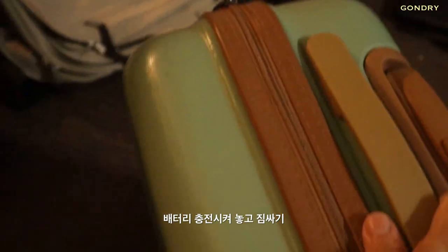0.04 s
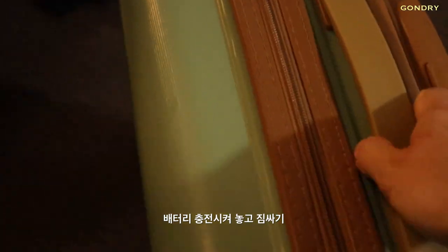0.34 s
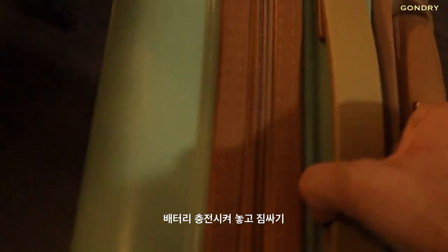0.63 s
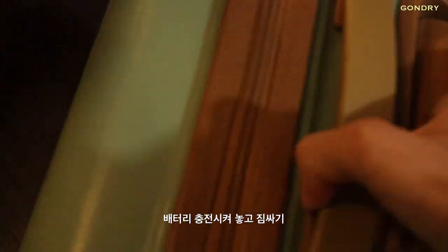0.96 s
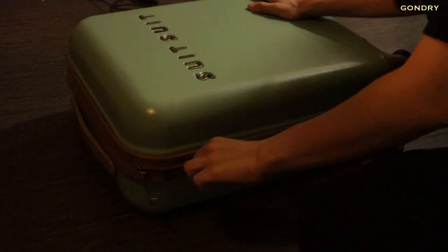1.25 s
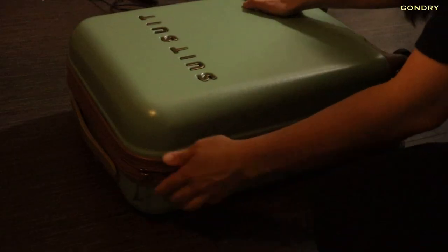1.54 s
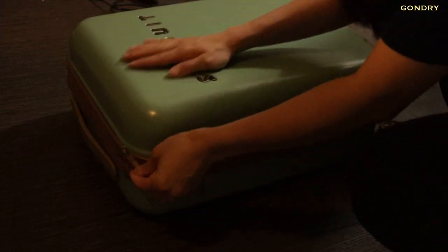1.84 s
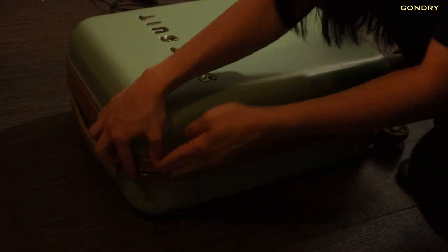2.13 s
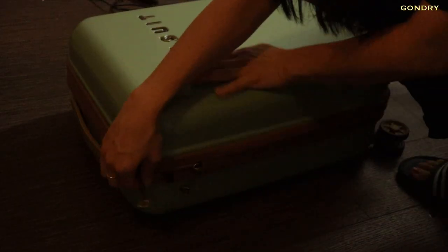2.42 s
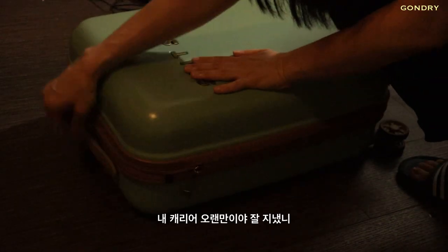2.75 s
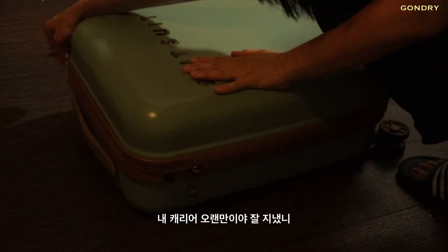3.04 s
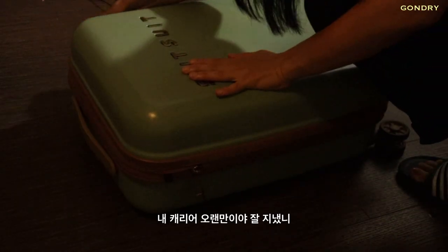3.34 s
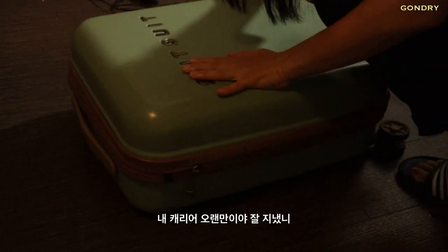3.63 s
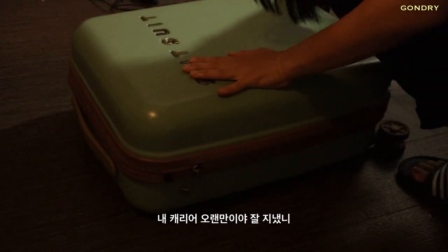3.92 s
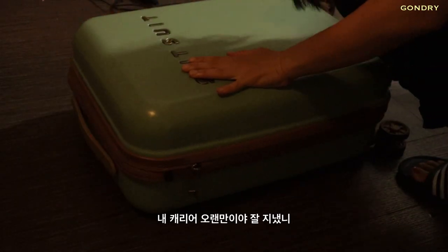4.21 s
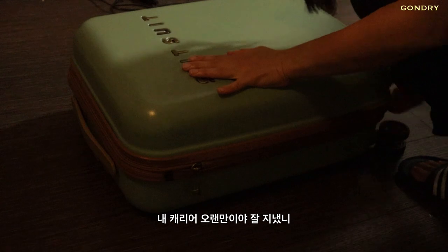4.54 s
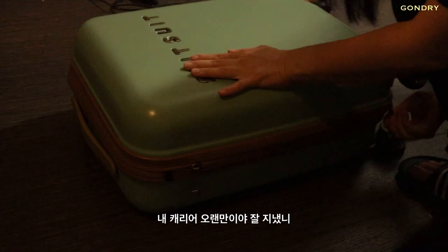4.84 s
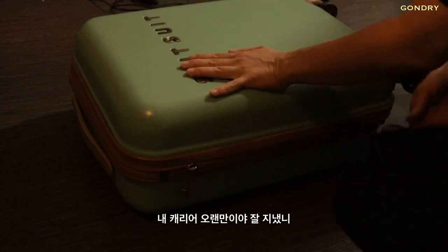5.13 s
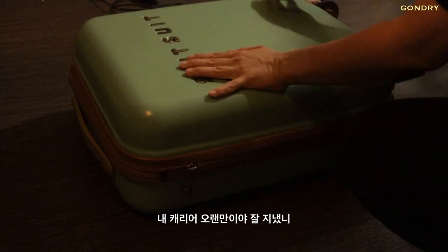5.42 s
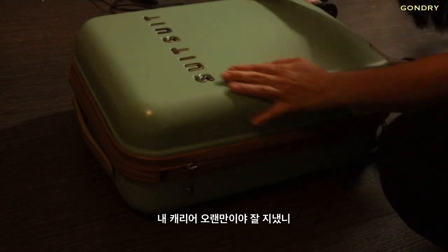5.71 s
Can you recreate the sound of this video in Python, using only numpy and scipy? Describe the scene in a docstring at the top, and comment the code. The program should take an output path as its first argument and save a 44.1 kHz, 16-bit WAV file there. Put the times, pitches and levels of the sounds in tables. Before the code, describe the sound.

Hands rub a hard-shell suitcase, metal pull tabs click and snap, and the zipper rasps open in four strokes in a small room.

```python
"""A zipper runs round a hard-shell suitcase in four strokes, on the floor of a small room. Each tooth ticks as
it parts; the ticks blur into a buzz that rises with speed, and the shell hums along. Metal pull tabs click and
jingle, mostly before it but also during and after, and one snaps out of its lock. Palms rub over the plastic
and the hollow case gives soft knocks, over still air and a deep drone."""
import sys
import numpy as np
from scipy import signal
from scipy.fft import rfft, irfft
from scipy.io import wavfile
from scipy.ndimage import uniform_filter1d

SR = 44100
rng = np.random.default_rng(int(sys.argv[2]) if len(sys.argv) > 2 else 0)


def generate_wav(signal):
    """Clip the signal to [-1, 1] and save it as 16-bit WAV at the path in sys.argv[1]."""
    frames = np.transpose(np.atleast_2d(signal))
    scaled = np.clip(frames, -1, 1) * 32767
    pcm = np.round(scaled).astype(np.int16)
    wavfile.write(sys.argv[1], SR, pcm)


N = 254456
TIME, FREQS_HZ = np.arange(N) / SR, np.fft.rfftfreq(N, 1 / SR)


def amp(db):
    """Turns decibels into a gain."""
    return 10 ** (np.asarray(db) / 20)


def unit(x):
    """Scales a signal to an average strength (rms) of 1."""
    return x / np.sqrt(np.mean(x ** 2) + 1e-20)


def read(points, hz):
    """Looks up a curve at any pitch, blending between its points."""
    point_hz, value = np.transpose(points)
    return np.interp(np.log(hz + 1), np.log(point_hz + 1), value)


def colour(x, points):
    """Makes some pitches louder and others softer, following a curve."""
    return irfft(rfft(x) * amp(read(points, np.fft.rfftfreq(x.shape[-1], 1 / SR))), x.shape[-1])


def below(x, edge):
    """Near 1 under the edge, falling smoothly to 0 above it."""
    return 1 / (1 + (x / edge) ** 4)


def bump(hz, centre_hz, octaves):
    """A bell-shaped hill around one pitch."""
    return np.exp(-(np.log2((hz + 1) / centre_hz) / octaves) ** 2)


def wander(hz):
    """A random wobble, mostly slower than hz."""
    return unit(irfft(rfft(rng.standard_normal(N)) * below(FREQS_HZ, hz), N))


def gate(start_s, end_s):
    """1 between two times and 0 outside, with soft edges."""
    return uniform_filter1d(1.0 * (TIME >= start_s) * (TIME <= end_s), size=300)


def swell(*times_s):
    """One push of a hand: rises from the earliest time, peaks at the middle one, ends at the latest."""
    push = np.interp(TIME, np.sort(times_s), [0, 1, 0])
    return uniform_filter1d(np.sin(np.pi / 2 * push) ** 1.47, size=900)


def add(mix, start_s, sound):
    """Drops a sound into the mix."""
    part = mix[..., round(start_s * SR):][..., :sound.shape[-1]]
    part += sound[..., :part.shape[-1]]


def spread(pair, width):
    """Makes left and right from two noises: alike in the bass, different in the treble."""
    side = colour(pair[1], width)
    return np.array([pair[0] + side, pair[0] - side])


# How long the room echoes (a fade is a drop of 60 dB): pitch_hz, fade_s
ROOM_FADE = [(120, 0.23), (500, 0.34), (2500, 0.29), (6000, 0.33), (13000, 0.18)]
# How much the echo differs between left and right: pitch_hz, side_db
ECHO_WIDTH = [(60, -36), (250, -19), (700, -16), (1400, -21), (2400, -14), (4000, -2.5), (7000, 3),
              (12000, 3)]

def room(x, early_db, tail_db, early_s=0.017):
    """The direct sound, quick echoes off floor and case, then the fading tail of the room."""
    size = SR // 2
    t = np.arange(size) / SR
    bounces = rng.standard_normal((2, 2, size)) * (rng.random((2, 2, size)) < 5000 / SR) * (t > .0015)
    hz, age_s, bands = signal.stft(bounces[0], SR, nperseg=256)
    bands = bands * amp(-60 * age_s / read(ROOM_FADE, hz)[:, None])
    tail = signal.istft(bands, SR, nperseg=256)[1][:, :size]
    tail *= 1 - np.exp(-t / 0.0092)
    tail = amp(tail_db) * tail / np.linalg.norm(tail[0])
    early = bounces[1] * np.exp(-t / early_s)
    early = amp(early_db) * early / np.linalg.norm(early[0])
    echo = spread(tail + early, ECHO_WIDTH)
    echo[:, 0] += 1  # the direct sound
    return signal.fftconvolve(x[None], echo, axes=1)


def tone(hz, waver):
    """A pure tone whose pitch wavers."""
    return np.sqrt(2) * np.sin(2 * np.pi * np.cumsum(hz * (1 + waver * wander(13.5))) / SR)


# The tone of still air: pitch_hz, level_db
AIR_COLOUR = [(15, -25), (30, -18), (45, -19), (62, 1.5), (130, 4), (200, 0), (310, -7), (725, -11),
              (2200, -18.5), (4000, -26), (6200, -37.5), (11000, -39), (14000, -52)]
# How much air and rubbing differ between left and right: pitch_hz, side_db
AIR_WIDTH = [(60, -36), (170, -20), (350, -9), (700, -6), (1400, -8), (2800, -8), (6000, 0), (12000, 2)]

def background(air_db=-53.5, drone_db=-63, lift_db=7.7, whine_db=-72.5):
    """Still air, a deep drone that is louder for a moment early on, and a faint whine."""
    air = unit(colour(spread(rng.standard_normal((2, N)), AIR_WIDTH), AIR_COLOUR)) * amp(air_db)
    drone = tone(hz=46.4, waver=0.053) * amp(drone_db + lift_db * gate(0.3, 1.25))
    whine = tone(hz=2364, waver=0.00287) * amp(whine_db)
    return air + drone + whine


# Swells of low rumble: three times for swell() (time_s, time_s, time_s), level_db
RUMBLE_SWELLS = [(0, 0.643, 1.01, -48.5), (1.183, 1.36, 1.35, -47), (1.8, 2.3, 2.33, -52)]
# The tone of the rumble: pitch_hz, level_db
RUMBLE_COLOUR = [(30, -13), (55, -14), (80, -2.5), (120, 3), (240, -3), (330, -7.5), (700, -19),
                 (2000, -82)]

def rumble(gain_db=-3):
    """Swells of low rumble."""
    swells = sum(swell(*times_s) * amp(db + gain_db) for *times_s, db in RUMBLE_SWELLS)
    return unit(colour(rng.standard_normal(N), RUMBLE_COLOUR)) * swells


# Palms sliding on the shell: start_s, peak_s, end_s, rub_db, sheen_db
RUBS = [(0, 0.015, .35, -53.5, -60), (.01, .21, 0.65, -47, -92), (.35, .6, 1.03, -57, -97),
        (1.04, 1.202, 1.29, -69, -66), (1.227, 1.27, 1.33, -54, -87), (1.52, 1.555, 1.66, -52.5, -64),
        (1.645, 1.68, 1.79, -42.5, -59), (1.7, 1.846, 2, -44.5, -54.5), (1.863, 2.163, 2.55, -50, -58),
        (1.958, 1.98, 2.034, -40.5, -65), (5.068, 5.13, 5.47, -55, -76), (5.46, 5.736, 6.1, -51.5, -69)]
# The tone of skin on plastic: pitch_hz, level_db
PALM_COLOUR = [(120, -23), (200, 2), (280, -11.5), (301, -12), (478, -4), (561, -34), (1040, -7),
               (2050, -1), (8070, -14), (11300, -11), (14000, -38)]

def palms(rub_gain_db=-3, sheen_gain_db=-2, grain_db=3, flutter_db=1):
    """Dry skin crosses textured plastic in tiny slips: a soft rub with a thin, high sheen on top."""
    slips = rng.standard_normal((2, N)) * amp(grain_db * wander(2400) + flutter_db * wander(5.5))
    hiss = rfft(colour(spread(slips, AIR_WIDTH), PALM_COLOUR))
    rub = unit(irfft(hiss * below(FREQS_HZ, 7800), N)) * amp(rub_gain_db)
    sheen = unit(irfft(hiss * (1 - below(FREQS_HZ, 10000)) ** 2, N)) * amp(sheen_gain_db)
    return sum(swell(*times_s) * (rub * amp(rub_db) + sheen * amp(sheen_db))
               for *times_s, rub_db, sheen_db in RUBS)


# Soft knocks on the case: start_s, level_db, pitch_factor, fade_factor
KNOCKS = [(0.325, -45, 1.55, 1), (0.692, -36, 0.94, 0.73), (0.82, -46.5, 1.53, .6),
          (0.986, -33.5, 0.99, 0.35), (1.311, -43, 1.2, 1), (1.57, -29.5, 1, 0.93), (1.672, -33, 1.07, 1.4),
          (1.829, -43.5, 0.55, 1.4), (1.862, -39, 0.87, 0.64), (2.188, -34, 0.89, 1.6),
          (2.439, -39, 0.95, 1), (2.482, -37, 0.84, 1), (2.545, -39, 1.17, 1), (2.735, -38, 1.1, 1.3),
          (2.819, -29.5, 1, 1.9), (4.117, -43, 1.05, 1.02), (4.611, -27, 1.04, 1),
          (5.267, -43.5, 1.4, 0.96), (5.56, -37.5, 0.92, 1), (5.651, -32, 0.99, 0.39),
          (5.748, -42, 0.92, 0.87)]
# The notes of the knocked shell: pitch_hz, level_db, fade_s
SHELL_NOTES = [(143.5, 7.5, 0.07), (154.4, 18.5, 0.091), (179.4, 3, 0.13), (260, -10, 0.11),
               (388, -18, 0.045)]

def knocks(gain_db=1):
    """The hollow shell answers a blow with a few short, low notes."""
    t, out = np.arange(SR // 4) / SR, np.zeros((2, N))
    for start_s, db, pitch_factor, fade_factor in KNOCKS:
        thud = 0
        for hz, note_db, fade_s in SHELL_NOTES:
            pitch_hz = hz * pitch_factor * rng.uniform(.96, 1.04)
            thud += amp(note_db - 60 * t / (fade_s * fade_factor)) * np.sin(2 * np.pi * pitch_hz * t)
        soft_start = below(.001, t + 1e-6)
        thud = np.gradient(thud * soft_start)  # a small panel gives off little deep bass
        add(out, start_s, amp(db + gain_db) * room(thud / abs(thud).max(), early_db=-4, tail_db=-10.5))
    return out


# Rings of a pull tab: start_s, level_db, free_s, upper_notes_db, rattle_radians (drift over 1 ms)
JINGLES = [(1.509, -52, .005, -12, .5), (1.655, -47.5, 0.0062, -2, 1.1), (1.674, -41.5, 0.012, 7, .7),
           (1.713, -49, 0.0033, 3, 1.1), (2.19, -29.5, 0.04, -8, .14), (2.347, -46.5, 0.0039, -5, 1.2),
           (2.385, -56.5, .0015, 1, 1.5), (2.436, -57, 0.0027, -3, 1.2), (2.447, -62, .002, 3, 1.4),
           (4.74, -64.5, .004, 2, 1.4), (5.084, -58.5, 0.0041, 8, 1.6), (5.219, -71, .006, 7, 1.3),
           (5.316, -63, .004, 0, 1.6), (5.357, -69, .004, 3, 1.6), (5.409, -69, .015, 12, .7)]
# The notes of a metal tab: pitch_hz, level_db, fade_s
TAB_NOTES = [(9200, -25, 0.077), (10450, 0, 0.19), (10600, -11, .085), (11880, -6, 0.07), (12100, -10, .1),
             (12600, -19, .048)]

def jingles(vary_db=1.5, upper_hz=11500):
    """A struck pull tab rings until fingers grip it; rattling on its loop blurs its pitch."""
    t, out = np.arange(SR // 10) / SR, np.zeros((2, N))
    for start_s, db, free_s, upper_db, rattle in JINGLES:
        ring = 0
        for hz, note_db, fade_s in TAB_NOTES:
            blur = rattle * np.cumsum(rng.standard_normal(len(t))) / np.sqrt(SR / 1000)
            height_db = note_db + upper_db * (hz > upper_hz) + vary_db * rng.standard_normal()
            ring += amp(height_db - 60 * t / fade_s) * np.sin(2 * np.pi * hz * t + blur)
        ring *= below(t, free_s) ** 2  # the fingers close on it
        ring = room(ring / np.linalg.norm(ring), early_db=-11, tail_db=-27, early_s=.008)
        add(out, start_s, amp(db) * np.sqrt(.01 * SR) * ring)
    return out


# Spells of fidgeting: start_s, end_s, ticks_per_s, level_db
FIDGETS = [(0.85, 1.298, 7, -75), (1.748, 2.112, 8, -50), (3.85, 4.2, 6, -57), (5.1, 5.4, 9, -57)]
# What the ticks share: hollow_db, bright_db, spot_hz, skid_s
TICK = (1, -31, 1627, -1)

def fidgets(vary_db=2.5, vary_octaves=0.48):
    """Fingers and tabs tick faintly at random moments; gives extra rows for clicks() to play."""
    hollow_db, bright_db, spot_hz, skid_s = TICK
    rows = []
    for start_s, end_s, per_s, db in FIDGETS:
        span_s = end_s - start_s
        for when, force, spot in rng.random(size=(16, 3))[:round(per_s * span_s)]:
            tick_db = db + vary_db * (2 * force - 1)
            tick_hz = spot_hz * 2 ** (vary_octaves * (2 * spot - 1))
            rows.append((start_s + span_s * when, tick_db, hollow_db, bright_db, tick_hz, skid_s))
    return rows


def chatter(blow, skid_s, clean_cycles=7):
    """Metal skids as it lands, smearing the treble of a blow; a long skid turns it into a scrape."""
    size = len(blow)
    skid = rfft(rng.standard_normal(size) * np.exp(-np.arange(size) / SR / skid_s))
    skid /= np.sqrt(np.mean(abs(skid) ** 2))
    clean = below(np.fft.rfftfreq(size, 1 / SR), clean_cycles / skid_s)
    return irfft(rfft(blow) * (clean + np.sqrt(1 - clean ** 2) * skid), size)


# Clicks of tabs, slider and lock: start_s, level_db, hollow_db, bright_db, spot_hz, skid_s
CLICKS = [(0.3235, -46, 9, -11, 766, 0.0043), (0.6464, -45, 5, -7, 890, 0.0068),
          (0.673, -48, 18, -10, 500, .008), (0.6921, -30, 17, 18, 2000, 0.0022),
          (0.8015, -44.5, 8, 19, 2100, 0.0027), (0.804, -40, 18, 16.5, 2100, 0.0033),
          (0.8105, -47, 8, 15, 620, 0.0014), (0.819, -40, 15, -3, 640, 0.0018),
          (0.903, -56, 0, 6, 3000, .002), (0.931, -51, 7, 1, 1520, .004),
          (0.9845, -48, 5, 17.5, 400, 0.0045), (1.085, -61, -7, 22, 5870, .001),
          (1.226, -63, 5, 47, 7400, 0.00051), (1.311, -45, 11, -34, 2760, .012),
          (1.508, -35, -4, -9, 2760, 0.0014), (1.5705, -53, 2, 3, 2400, .001),
          (1.6535, -41, 1, -11, 2860, .008), (1.6715, -23.5, 12, -1.5, 3100, 0.0017),
          (1.7129, -34, 10, 6, 1670, 0.0023), (1.783, -43, 4, -12, 1400, .002),
          (1.8405, -40, -4, -15, 2300, .002), (1.8452, -35.5, -8, -20, 1910, .0015),
          (1.859, -39.5, 0, -8, 3300, 0.002), (2.093, -47, 0, -20, 1500, .002),
          (2.1241, -37.5, 9.5, -41, 2000, .0018), (2.1906, -19, -2, 5.5, 3100, 0.0021),
          (2.195, -24.5, -4, 8, 1900, 0.012), (2.34, -38.5, -1, -6, 1790, 0.0048),
          (2.348, -34, -4, -52, 1890, 0.0028), (2.436, -42, 6, 13, 2330, 0.0038),
          (2.4968, -47.5, -4, -1, 4200, 0.0028), (2.528, -54, -8, -8, 4000, .003),
          (3.803, -54, 0, -10, 2000, .002), (3.824, -51, 2, -15, 1250, .002),
          (4.229, -53, 2, -12, 1500, .002), (4.2515, -47, 2, -10, 1305, 0.002),
          (4.61, -33.5, -3, -26, 1548, .002), (4.625, -45, 15, -10, 1369, 0.0029),
          (4.7397, -54, 16, -8, 4390, 0.0021), (4.8315, -50.5, -1, 4, 1380, 0.002),
          (4.9525, -48, -4, -14, 3000, .002), (4.9692, -42, -4, -20, 1400, 0.001),
          (5.0836, -44.5, 15, 2, 2240, 0.0064), (5.1055, -50, 2, -4, 2400, .0015),
          (5.1742, -48.5, 0, -10, 1870, 0.0018), (5.219, -53, 4, -12, 1410, .002),
          (5.2655, -44, 14, -32, 2800, 0.0012), (5.277, -52, 10, -26, 910, 0.0098),
          (5.3149, -46.5, 9, -21, 1600, 0.0023), (5.3557, -49.5, 6, -20, 2720, 0.005),
          (5.5205, -55, 2, -20, 1900, .002), (5.536, -45, 2, -41, 2610, 0.0015),
          (5.6051, -45, 6, 5, 1700, 0.01), (5.6475, -45, 3, -5, 1900, 0.0049)]
# The tone of a click: pitch_hz, level_db
CLICK_COLOUR = [(40, -51), (200, -6.5), (550, -4), (1000, -1), (1600, 3), (2500, 0.5), (3500, -0.5),
                (4500, -4.5), (5800, -15.5), (7400, -19), (8800, -23), (11000, -24), (14000, -47)]

def clicks(hollow_hz=650, bright_hz=5600, spot_db=7, scatter_db=-3.5, bend_s=0.0007):
    """Metal taps plastic; each spot that is hit rings at its own pitch."""
    size, out = 2048, np.zeros((2, N))
    signed_hz = np.fft.fftfreq(size, 1 / SR)
    hz = abs(signed_hz)
    # high pitches cross the shell faster, so a blow arrives slightly drawn out
    lag = 4 * np.pi * bend_s * np.sqrt(1000 * hz) * np.sign(signed_hz)
    for start_s, db, hollow_db, bright_db, spot_hz, skid_s in CLICKS + fidgets():
        shape_db = read(CLICK_COLOUR, hz) + hollow_db * bump(hz, hollow_hz, octaves=0.93)
        shape_db += bright_db * (1 - below(hz, bright_hz))
        shape_db += spot_db * bump(hz, spot_hz, octaves=.48)
        log_spectrum = np.conj(signal.hilbert(np.log(amp(shape_db))))  # puts the crack first
        blow = chatter(np.fft.ifft(np.exp(log_spectrum - 1j * lag)).real, skid_s)
        click = room(blow / np.linalg.norm(blow), early_db=scatter_db, tail_db=-6, early_s=0.011)
        strength = amp(db) * np.sqrt(.01 * SR / (1 + amp(scatter_db) ** 2))  # level over 10 ms
        add(out, start_s, strength * click)
    return out * amp([[-.7], [.7]])  # a little to the right


def snap(start_s=2.191, pitch_hz=2640, rise_s=.0003, fade_s=.004):
    """The plastic lock kicks for a few cycles as it lets the tab go."""
    t, out = np.arange(SR // 20) / SR, np.zeros((2, N))
    kick = (1 - np.exp(-t / rise_s)) * amp(-60 * t / fade_s) * np.sin(2 * np.pi * pitch_hz * t)
    add(out, start_s, room(kick / abs(kick).max(), early_db=-12, tail_db=-17, early_s=.007))
    return out * amp([[-.7], [.7]])


# Notes of the shell that the teeth keep ringing: pitch_hz, width_hz, level_db
BOOM_NOTES = [(166, 21, -57), (376, 32, -51.5), (483, 26, -54)]
# Their boost, one row a stroke: low_note_db, middle_note_db, high_note_db
BOOM_LIFTS = [(6, 1.5, -3), (.5, -3, .5), (1.5, 5, -1), (5, -5, -7)]

def boom(drive, strokes):
    """The teeth keep the shell's own notes ringing; each side of the case favours different ones."""
    out = 0
    for (hz, width_hz, db), lifts_db in zip(BOOM_NOTES, np.transpose(BOOM_LIFTS)):
        ring = irfft(rfft(drive) / (1 + 1j * (FREQS_HZ - hz) / width_hz) ** 2, N)
        gain = sum(gate(rows[0][0], rows[-1][0]) * amp(db + lift_db)
                   for rows, lift_db in zip(strokes, lifts_db))
        out += gain * ring / np.sqrt(abs(uniform_filter1d(ring ** 2, size=5000)) + 1e-14)
    return out


# Clear tones in the buzz: tooth_rate_multiple, level_db
OVERTONES = [(2, -5.5), (3, -10.5), (4, -11)]

def overtones(travel, flicker_db=4, slip_cycles=.06):
    """Teeth that part evenly sing at multiples of their rate; each tone swells and slips by itself."""
    out = 0
    for multiple, db in OVERTONES:
        flicker = amp(flicker_db * wander(30))
        cycles = multiple * travel + slip_cycles * wander(90) + rng.random()
        out += amp(db) * unit(flicker * np.sin(2 * np.pi * cycles))
    return out


def hum(travel, slip_cycles=.085, throb_db=3):
    """The shell swings at the rate of the teeth, but loosely, because the zipper's tape gives."""
    swing = np.sin(2 * np.pi * (travel + slip_cycles * wander(90)))
    return unit(swing * amp(throb_db * wander(34)))


def teeth(travel, rate, rough, catch_db=2, uneven_db=3, scrape_db=-7, bounce_db=-8):
    """Each tooth lets go a little early or late, with a tick and a short scrape."""
    parted = np.maximum.accumulate(abs(travel + .068 * rough * wander(220)))
    tooth = parted.astype(int)
    catch = amp(catch_db * wander(26))
    force = amp(uneven_db * rng.standard_normal(N))[tooth] * catch
    ticks = np.diff(tooth, prepend=0) / np.sqrt(rate / SR)
    scrape = unit(np.exp(-(parted % 1) / 0.61) * rng.standard_normal(N))
    drive = force * (ticks + amp(scrape_db) * rough * scrape)
    bounce_s = .0011 * (1 + .15 * wander(4.62))  # the echo off the floor shifts as the slider travels
    return drive + amp(bounce_db) * np.interp(TIME - bounce_s, TIME, drive)


def cross_shell(x, delay_s=.002):
    """Low pitches cross the shell more slowly than high ones; delay_s holds at 1 kHz."""
    return irfft(rfft(x) * np.exp(-4j * np.pi * delay_s * np.sqrt(1000 * FREQS_HZ)), N)


# The tone of the teeth on the case: pitch_hz, level_db
TEETH_COLOUR = [(30, -40), (60, -15), (100, -4), (155, -0.5), (225, -0.5), (290, 1.5), (365, -1), (550, -4),
                (800, -9.5), (1100, -11.5), (1800, -12.5), (2000, -13.5), (2300, -12.5), (2550, -15),
                (3000, -16.5), (5600, -28), (11000, -10), (13500, -22)]
# Extra fizz, highest as the slider rounds a corner: time_s, lift_db
FIZZ_LIFT = [(2.55, 3), (2.8, 8.5), (2.9, 17.5), (3.0, 3), (3.3, -1.5), (3.6, 3), (4.3, -12), (4.58, -2),
             (4.9, -2)]
# The slider's strokes, one list each: time_s, teeth_per_s, pull_db, rough_factor, hum_db, overtones_db
STROKES = [
    [(2.45, 122, -8.5, 1.24, -47, -80), (2.61, 151, 1, 1.22, -52, -70), (2.655, 215, 1, 0.62, -34, -66),
     (2.685, 295, -1, 1.1, -52, -64), (2.755, 490, -3, 1.0, -46, -58), (2.79, 630, -4, .8, -46, -52),
     (2.825, 770, -3.5, .6, -39, -48), (2.848, 885, -2, .5, -45, -41), (2.87, 915, .5, .6, -44, -37),
     (2.888, 760, 3, .6, -43, -40), (2.908, 660, 4.5, .8, -55, -42), (2.93, 570, 3, 1.2, -50, -52),
     (2.96, 400, 1, 1.7, -60, -62), (2.995, 335, 1.5, 0.6, -42, -66), (3.04, 330, -11.5, .8, -55, -72),
     (3.09, 206, -12, 1.33, -75, -80)],
    [(3.14, 111, -29, 1.3, -78, -80), (3.19, 140, -4, 1.28, -54, -72), (3.27, 250, -3, 0.67, -49, -66),
     (3.35, 370, -1, 0.78, -63, -51), (3.41, 452, -1, 1.15, -40.5, -59), (3.5, 485, -2.5, 1.16, -37.5, -62),
     (3.54, 570, -2.5, 0.72, -47, -56), (3.6, 585, -2, .7, -56, -50), (3.645, 580, -.5, 0.46, -58, -46),
     (3.67, 540, -1, .8, -48, -54), (3.695, 470, -1.5, 1.29, -40, -63), (3.735, 440, -6, 1.4, -44.5, -66),
     (3.775, 209, -4.5, 1.35, -66, -76), (3.97, 113, -6.5, 1.3, -69, -80)],
    [(4.07, 127, -1, 1.28, -51, -80), (4.21, 169, -8.5, 1.38, -71, -76), (4.31, 260, -4, 1.08, -54.5, -68),
     (4.37, 340, -3.5, 1.43, -46, -64), (4.41, 300, -1.5, 1.5, -42, -64), (4.46, 360, -2.5, 1.5, -44, -62),
     (4.5, 300, -1.5, 1.48, -48, -62), (4.54, 408, .5, 1.4, -45.5, -56), (4.57, 490, 1, .5, -47, -47),
     (4.607, 475, 2.5, 0.51, -45, -47), (4.625, 190, 6.5, 1.19, -48, -66),
     (4.7, 160, 2.5, 0.44, -38.5, -70), (4.76, 158, -2, 0.63, -52, -76), (4.8, 146, -9, 1.15, -51, -80)],
    [(4.83, 134, -1, 1.27, -49.5, -80), (4.86, 172, 7.5, 1.2, -43, -70), (4.91, 190, 10.5, 1.47, -44, -66),
     (4.955, 190, 8, 1.2, -40, -66), (4.99, 160, -3, 0.82, -47, -76), (5.07, 124, -4, 1.41, -58, -80)],
]

def zipper(usual_teeth_per_s=400, jitter=.026):
    """The slider parts the teeth: with speed and pull the shell drums, teeth rasp and tape fizzes."""
    times_s, *controls = np.concatenate(STROKES).T
    rate, pull_db, rough, hum_db, overtones_db = (np.interp(TIME, times_s, c) for c in controls)
    moving = gate(times_s[0], times_s[-1])
    travel = np.cumsum(rate * (1 + jitter * rough * wander(70))) / SR  # counted in teeth
    drive = teeth(travel, rate, rough)
    buzz = cross_shell(colour(drive, TEETH_COLOUR))
    spectrum = rfft(room(buzz, early_db=-6, tail_db=-3.5)[:, :N])
    tones = hum(travel) * amp(hum_db) + overtones(travel) * amp(overtones_db)
    out = room(tones * moving, early_db=-24, tail_db=-15.5)[:, :N]
    speed = rate / usual_teeth_per_s
    drum_db = -48 + 2.5 * np.log2(speed) + 0.85 * pull_db
    rasp_db = -48 + 6.9 * np.log2(speed) + pull_db
    fizz_db = -73.5 + 5.8 * np.log2(speed) + 0.92 * pull_db + np.interp(TIME, *np.transpose(FIZZ_LIFT))
    low, high = below(FREQS_HZ, 940), 1 - below(FREQS_HZ, 4000)
    for share, db in (low ** 2, drum_db), ((1 - low) * (1 - high), rasp_db), (high ** 2, fizz_db):
        band = irfft(spectrum * share, N)
        power = uniform_filter1d(band.mean(0) ** 2, size=3000)
        out += band / np.sqrt(abs(power) + 1e-14) * amp(db) * moving  # even it out, then set its level
    return out + boom(drive, STROKES) * amp(pull_db) * np.minimum(speed, 1)


def scene():
    """All the sounds together."""
    return zipper() + clicks() + snap() + jingles() + knocks() + palms() + background() + rumble()


def record(dry):
    """Cuts the deepest bass, gently squashes the hardest snap and trims the highest treble."""
    low_hz, high_hz, ceiling = 38, 14000, 1.1
    cut = signal.sosfilt(signal.butter(4, low_hz, "highpass", fs=SR, output="sos"), dry)
    squashed = ceiling * np.tanh(cut / ceiling)
    treble_cut = signal.firwin(161, high_hz, window=("kaiser", 9), fs=SR)
    return signal.oaconvolve(squashed, treble_cut[None], "same")


dry = scene()
out = record(dry)
generate_wav(out)
```